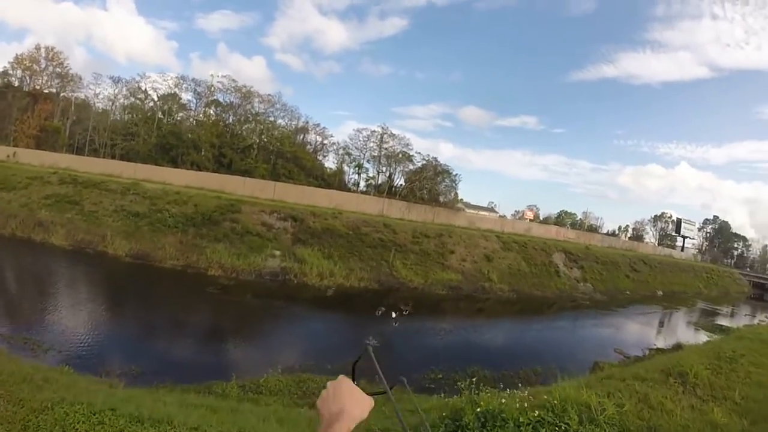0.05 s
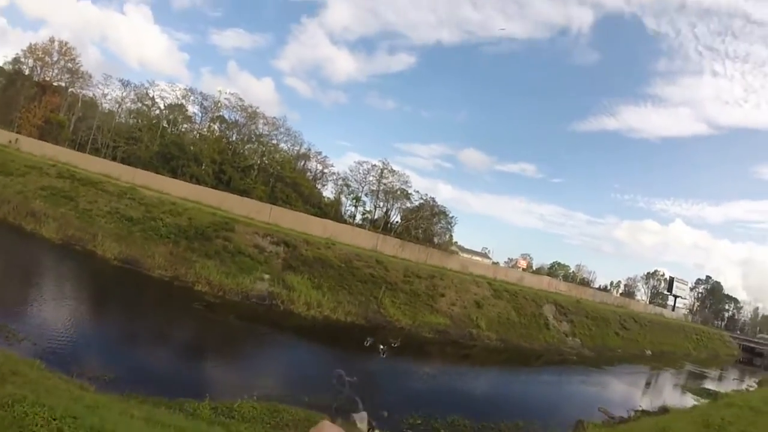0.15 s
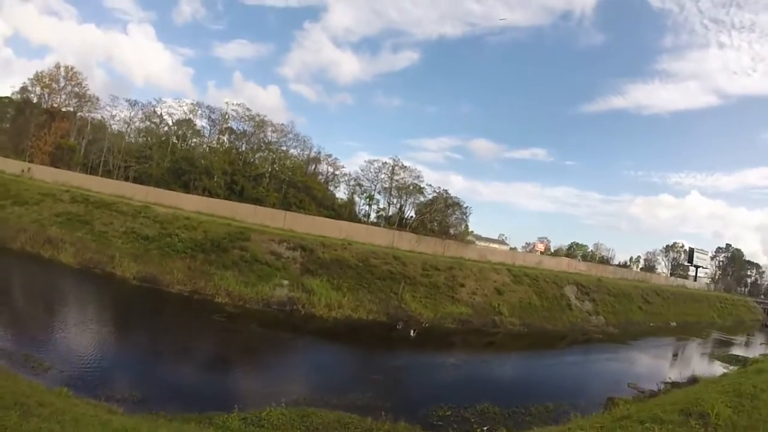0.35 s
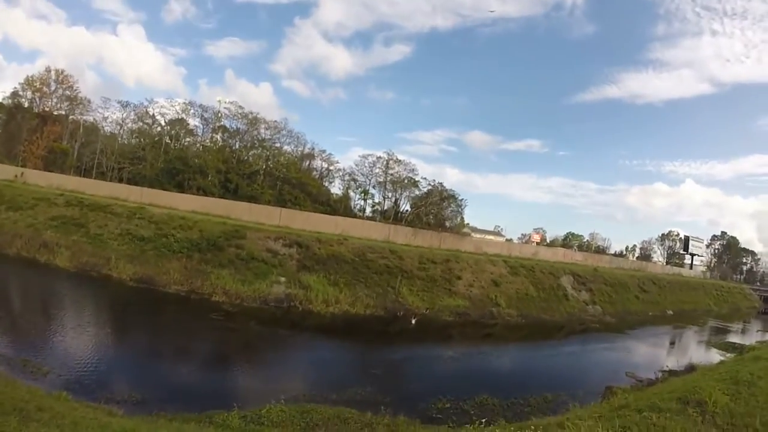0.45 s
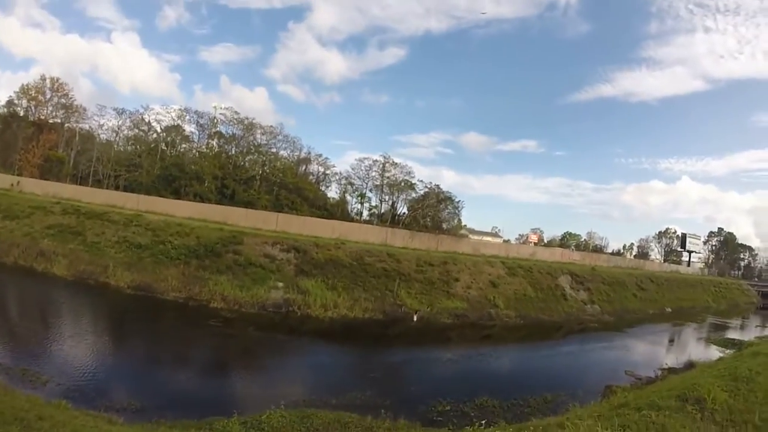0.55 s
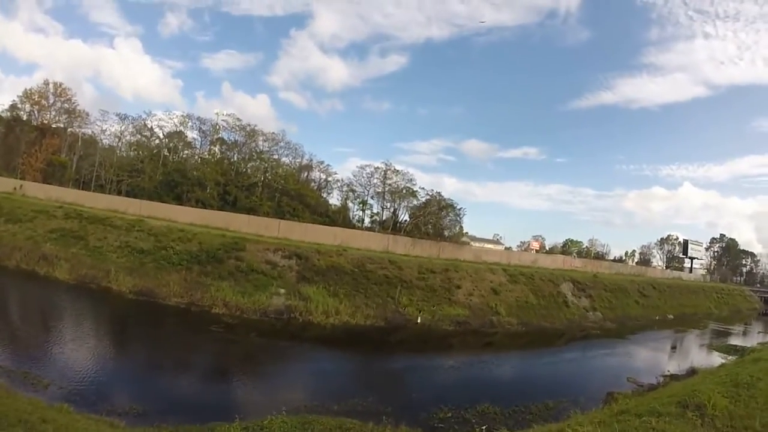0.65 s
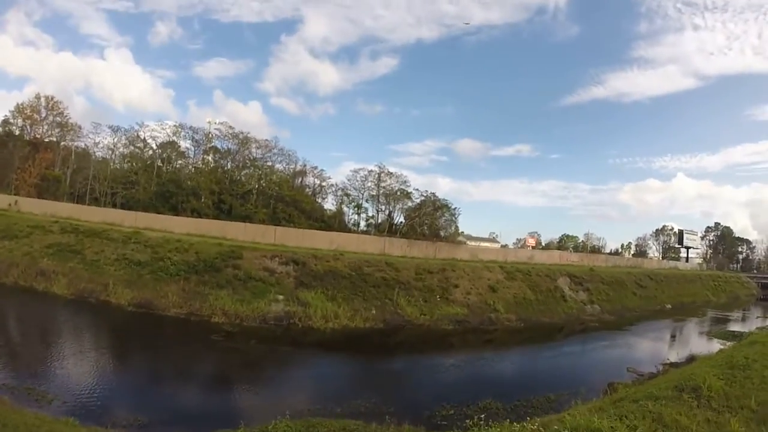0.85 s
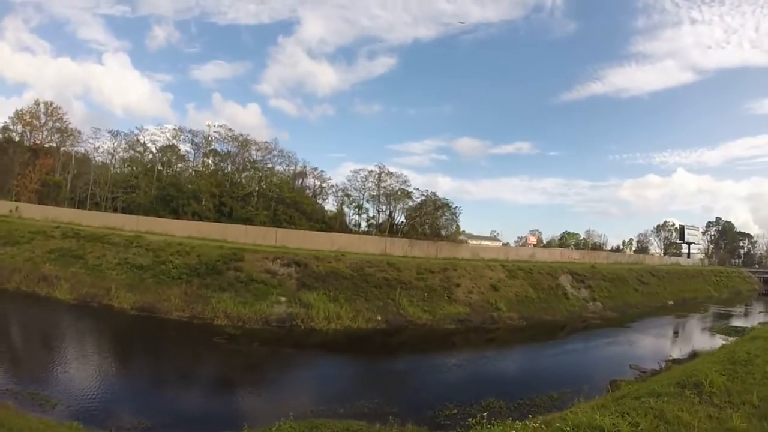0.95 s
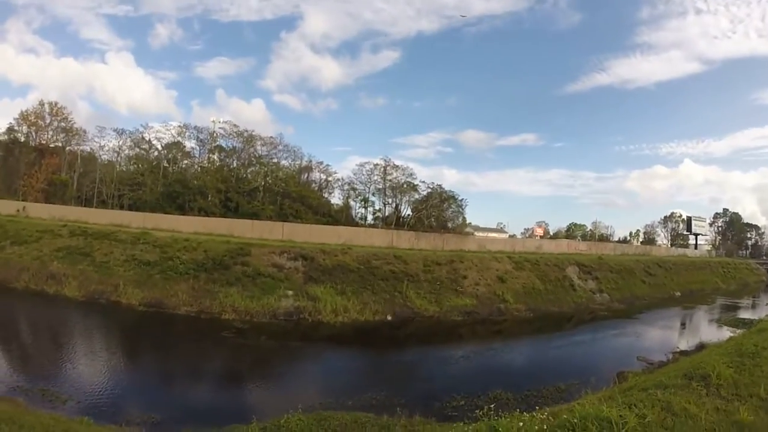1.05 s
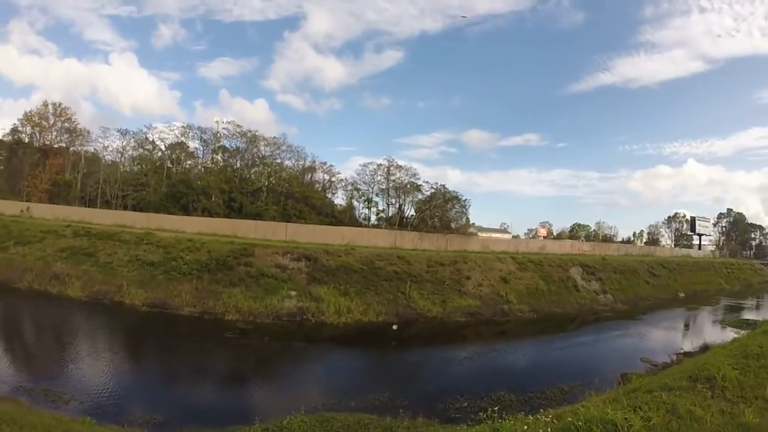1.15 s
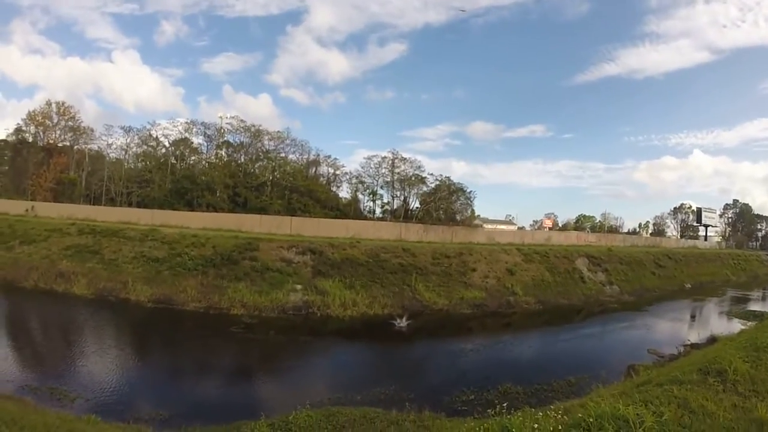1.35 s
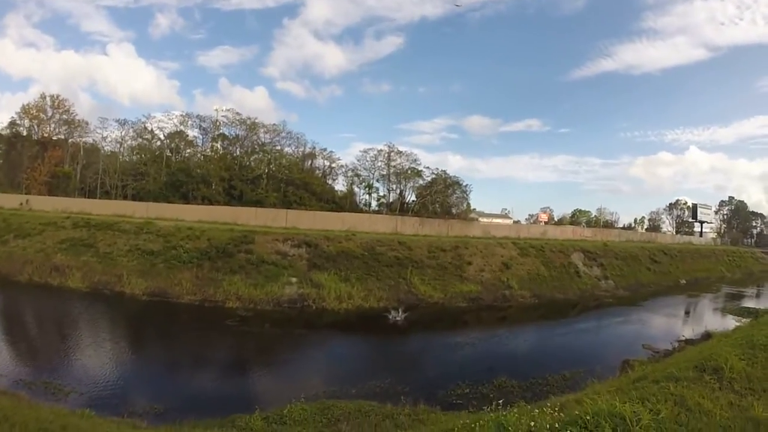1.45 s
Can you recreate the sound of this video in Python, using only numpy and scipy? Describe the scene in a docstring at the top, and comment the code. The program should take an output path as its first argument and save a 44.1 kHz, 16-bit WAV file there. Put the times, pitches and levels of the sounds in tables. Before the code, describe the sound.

A slingshot snaps sharply close by, over a light rumble of wind on the microphone.

```python
"""A light wind rumbles on the microphone, then a slingshot snaps at arm's length, on a grassy canal bank.
The pouch slips from the fingers, the bands whip forward, slap the fork and flap back; the near grass
and the far bank scatter the snap. The recoiling arm rustles its sleeve and buffets the microphone
with air. A second later the shot lands faintly across the water."""
import sys
import numpy as np
from scipy import signal
from scipy.fft import rfft, irfft, next_fast_len
from scipy.io import wavfile
from scipy.ndimage import uniform_filter1d

SR = 44100
rng = np.random.default_rng(int(sys.argv[2]) if len(sys.argv) > 2 else 0)


def master(y):
    """Save y as 16-bit WAV."""
    cut = np.clip(np.atleast_2d(y).T, -1, 1)
    pcm = np.round(cut * 32767)  # scale
    wavfile.write(sys.argv[1], SR, pcm.astype(np.int16))


N = 66150

# wash of open air along the canal: f/Hz, level/dB
AIR_COLOUR = [(30, 3.5), (140, 2), (250, 0), (450, -4.5), (900, -7), (1650, -8.5), (2100, -14), (3200, -12),
              (4000, -19), (4500, -17), (5200, -21.5), (8000, -27), (11000, -31.5), (13000, -35),
              (16000, -48)]
# rumble of wind on the microphone: f/Hz, level/dB
WIND_COLOUR = [(12, -11.5), (24, -2), (34, -0.5), (48, -4), (62, -18.5), (78, -27), (130, -39),
               (300, -56.5), (1000, -97)]
# gusts coming and going: t/s, level/dB
GUST_LEVELS = [(0, -35.5), (.05, -30), (.09, -33), (.14, -33.5), (.18, -35), (.27, -27), (.45, -34.5),
               (.48, -43), (.66, -40.5), (.73, -35.5), (.77, -37.5), (.82, -30), (.99, -35), (1.02, -50.5),
               (1.13, -46.5), (1.17, -35), (1.23, -51), (1.29, -42), (1.35, -41), (1.45, -47.5), (1.5, -38)]
# the landing, heard from across the water: f/Hz, level/dB
LANDING_COLOUR = [(150, 1), (450, 4), (1000, -1.5), (1650, 0), (2100, -16), (3000, -5.5), (5000, -20.5),
                  (12000, -45)]
# cloth rustling near the microphone: f/Hz, level/dB
SLEEVE_COLOUR = [(100, -1), (220, 6.5), (400, -2.5), (750, 5), (1100, -0.5), (1650, -1), (2100, -5),
                 (3200, -2), (3900, -13), (5000, -17), (6000, -17), (9000, -27.5), (16000, -55)]
# the rustle as the arm holds, recoils and settles: t/s, level/dB
RUSTLE_LEVELS = [(0, -53), (.17, -60.5), (0.236, -47.5), (.275, -47), (.3, -51.5), (.385, -50), (.4, -59),
                 (.52, -63), (.65, -77)]
# puffs of air on the microphone: middle t/s, length/s, f/Hz, peak level/dB
AIR_PUFFS = [(.211, 0.064, 43.3, -12.5), (0.27, 0.11, 29.05, -5), (0.364, 0.099, 25.4, -18)]
# turbulence in the strongest puff: f/Hz, level/dB
BUFFET_COLOUR = [(40, 2.5), (65, 3.5), (100, -1.5), (150, -10.5), (250, -24), (500, -52), (4000, -95)]
# returns from the near grass and the far bank: delay/s, rise/s, decay/s, level/dB
BANK_ECHOES = [(.006, 0.0086, 0.025, -18.5), (.115, 0.025, 0.084, -29.5)]
# tone of those returns: f/Hz, level/dB
SCATTER_COLOUR = [(150, 3), (700, 3), (1500, -1), (3200, -10), (5000, -22), (8000, -19), (15000, -31)]
# leather sliding out between the fingers: f/Hz, level/dB
SLIP_COLOUR = [(200, 4), (900, -5.5), (2500, 4), (4000, -11), (5200, -2), (6700, -0.5), (8000, -19),
               (9500, -10), (11000, -19), (13800, -15), (16000, -42)]
# the pouch flicking off the fingertips: f/Hz, level/dB, t60/s
POUCH_MODES = [(2320, 4.5, 0.0078), (2830, 1, 0.0058), (3340, -21, 0.0025)]
# rush of the bands through the air: f/Hz, level/dB
WHIP_COLOUR = [(200, -7.5), (600, 2.5), (1600, -4.5), (2100, -5.5), (3100, 4), (4500, 3), (5100, -7),
               (6500, -8.5), (9000, -18), (11000, -36), (13500, -40), (16000, -68)]
# ring of the fork and taut bands: f/Hz, level/dB, t60/s
FORK_MODES = [(1123, -14, 0.018), (1607, -10.5, 0.017), (1757, -15.5, 0.018), (2210, -21, 0.015),
              (2715, -10.5, 0.01), (3064, -2.5, 0.021), (3295, -1.5, .014), (3825, -11.5, 0.017),
              (4390, -5.5, 0.013), (4570, -8.5, 0.015), (5770, -16.5, 0.012), (6330, -15, 0.0088),
              (7840, -19, 0.0081), (8400, -20, 0.008)]
# crack of a slap on the fork: f/Hz, level/dB
CRACK_COLOUR = [(150, -24), (600, -6.5), (1150, -0.5), (1350, -10.5), (1600, 5), (2000, -6), (3200, -2),
                (4500, 0), (5100, -23), (6100, -13), (7200, -15), (8100, -10.5), (10000, -24.5),
                (11500, -21), (13500, -29), (16000, -45)]
# bands and pouch hitting the fork:
# t/s, level/dB, ring pitch ratio, ring length ratio, body/dB, treble/dB, crack offset/dB
FORK_SLAPS = [(0.202, -3.5, 0.98, 0.63, 0.5, 7.5, 3), (0.2035, 0.5, .97, 1.16, 6.5, -1, -3),
              (0.2054, 1.5, 1.029, 0.9, -4, -3, -16), (0.2073, 6.5, 1.032, 0.61, -12.5, -4.5, -11.5),
              (0.21, -6, 1.02, 0.67, -5, -3, 1.5), (0.2126, -2, 1.0, 0.98, -8, -2, -3.5),
              (0.2152, -14, .98, 0.66, -11, -10, -5), (.234, -2, .98, 0.93, -1, 4, -6.5),
              (.2355, -6.5, 1.0, 1.24, 9.5, 6, -9), (.247, -22, 1.02, 0.77, 0, 1, 2),
              (0.2599, -25, 1, 1.1, 2, -3, -8), (0.271, -22.5, 1.005, .8, -3, 0, -6),
              (.3145, -23.5, 1.053, 1.1, -2, -14, -11), (0.4798, -22.5, 0.98, 0.8, 2, -3, -3)]


def undb(db):
    """Decibels to gain."""
    return 10 ** (np.asarray(db) / 20)


def clock():
    """Time of every sample, in seconds."""
    return np.arange(N) / SR


def colour(x, points):
    """Causal filter through (f/Hz, level/dB) points that keeps the power of white noise."""
    hz, db = np.array(points, float).T
    size = 2 * next_fast_len(N // 2 + SR // 10, real=True)
    bin_hz = np.arange(size // 2 + 1) * SR / size
    gain = undb(np.interp(np.log(bin_hz + 1), np.log(hz), db))
    cepstrum = irfft(np.log(gain / np.sqrt(np.mean(gain ** 2))))
    cepstrum[1:size // 2] *= 2  # fold to minimum phase
    cepstrum[size // 2 + 1:] = 0
    return irfft(rfft(x, size) * np.exp(rfft(cepstrum)))[:N]


def noise(points):
    """Coloured noise of rms about 1."""
    return colour(rng.standard_normal(N), points)


def wander(rate_hz):
    """Straight lines between random values, rate_hz of them a second."""
    return np.interp(clock() * rate_hz, np.arange(N), rng.standard_normal(N))


def contour(points):
    """Gain that follows (t/s, level/dB) points."""
    return undb(np.interp(clock(), *np.array(points).T))


def fade(start, decay):
    """Sudden start, exponential decay; times in seconds."""
    age = clock() - start
    return (age >= 0) * np.exp(-np.maximum(age, 0) / decay)


def swell(start, rise, end, decay):
    """Straight rise, hold until the end, exponential decay; times in seconds."""
    t = clock()
    return np.clip((t - start) / rise, 0, 1) * np.exp(-np.maximum(t - end, 0) / decay)


def ring(start, modes):
    """Damped modes of alternating sign, struck at one moment."""
    age = np.maximum(np.arange(N) - int(start * SR), 0) / SR
    return sum((-1) ** k * undb(db) * np.sin(2 * np.pi * hz * age) * np.exp(-np.log(1000) * age / t60)
               for k, (hz, db, t60) in enumerate(modes))


def wind(air_db=-55.5, waver_db=-1.4, steady_s=0.0416):
    """Gusts rumble on the microphone over the faint, wavering wash of open air."""
    eddies = noise(WIND_COLOUR)
    running_rms = np.sqrt(uniform_filter1d(eddies ** 2, int(steady_s * SR)))
    gusts = eddies / running_rms * contour(GUST_LEVELS)
    air_gain = undb(air_db + waver_db * wander(rate_hz=8))
    return gusts + air_gain * noise(AIR_COLOUR)


def landing(start_s=1.3695):
    """The shot lands far off across the water: a dull tap and a short wash."""
    tap = fade(start_s, decay=0.003)
    wash = undb(-13.5) * fade(start_s, decay=0.034)
    return undb(-45.5) * colour(rng.standard_normal(N) * (tap + wash), LANDING_COLOUR)


def sleeve():
    """Close by, clothing rustles with the movement of the arm."""
    return noise(SLEEVE_COLOUR) * contour(RUSTLE_LEVELS)


def jolt():
    """The recoiling arm pushes air at the microphone: a little turbulence and very low pressure swings."""
    pressure = undb(-34) * noise(BUFFET_COLOUR) * swell(start=0.176, rise=0.037, end=0.258, decay=0.034)
    for middle, length, hz, db in AIR_PUFFS:
        age = clock() - middle
        window = np.cos(np.pi * np.clip(age / length, -.5, .5)) ** 2
        pressure -= undb(db) * window * np.cos(2 * np.pi * hz * age)
    return pressure


def banks(snap):
    """Diffuse echoes reach the microphone, first from the near grass, then from the far bank."""
    response = np.zeros(N)
    for delay, rise, decay, db in BANK_ECHOES:
        shape = swell(delay, rise, delay + rise, decay)
        response += undb(db) * noise(SCATTER_COLOUR) * shape / np.sqrt(np.sum(shape ** 2))
    return signal.fftconvolve(snap, response)[:N]


def release(free_s=0.1871, flutter_db=3):
    """The pouch slides from the fingers and flicks free, and the bands flutter through the air."""
    flutter = undb(flutter_db * wander(rate_hz=400))
    slip = undb(-46.5) * noise(SLIP_COLOUR) * swell(start=0.176, rise=0.0084, end=free_s, decay=0.0047)
    flick = undb(-26) * ring(free_s, POUCH_MODES)
    rush = undb(-41) * noise(WHIP_COLOUR) * swell(start=0.183, rise=0.013, end=0.2, decay=0.024)
    return slip + flick + rush * flutter


def contact(hz, body_db, treble_db, body_hz=1980, treble_hz=5230):
    """The place and hardness of a contact lift or lower its body and treble: two shelves, in dB."""
    return body_db / (1 + (hz / body_hz) ** 8) + treble_db / (1 + (treble_hz / hz) ** 8)


def slaps(crack_decay_s=0.0011):
    """Each slap cracks and rings the fork; the bands' pull shifts the ring and their grip damps it."""
    out = np.zeros(N)
    for start, db, pitch, length, body_db, treble_db, crack_db in FORK_SLAPS:
        modes = [(hz * pitch, mode_db + contact(hz, body_db, treble_db), t60 * length)
                 for hz, mode_db, t60 in FORK_MODES]
        fork = undb(-19) * ring(start, modes)
        burst = fade(start, crack_decay_s) * np.sign(rng.standard_normal(N))
        tone = [(hz, band_db + contact(hz, body_db, treble_db)) for hz, band_db in CRACK_COLOUR]
        crack = undb(-20.5 + crack_db) * colour(burst, tone)
        out += undb(db) * (fork + crack)
    return out


def scene():
    """One microphone on the bank: the snap at arm's length, its echoes, recoil, wind and far landing."""
    snap = slaps() + release()
    return (snap + banks(snap) + jolt() + sleeve() + wind() + landing())[None]


def record(dry):
    """The recorder cuts the top steeply."""
    top_hz = 16200
    return signal.sosfilt(signal.ellip(8, .2, 80, top_hz, fs=SR, output="sos"), dry)


dry = scene()
out = record(dry)
master(out)
```